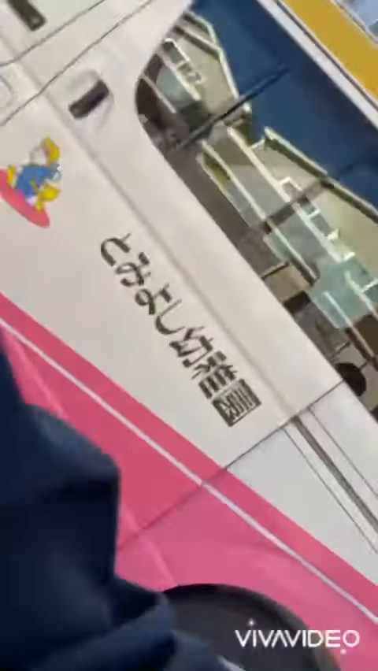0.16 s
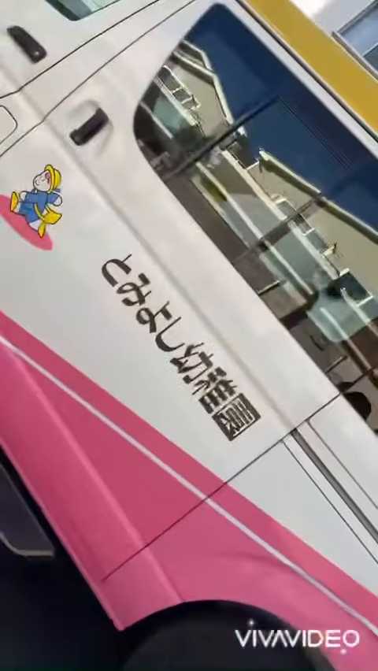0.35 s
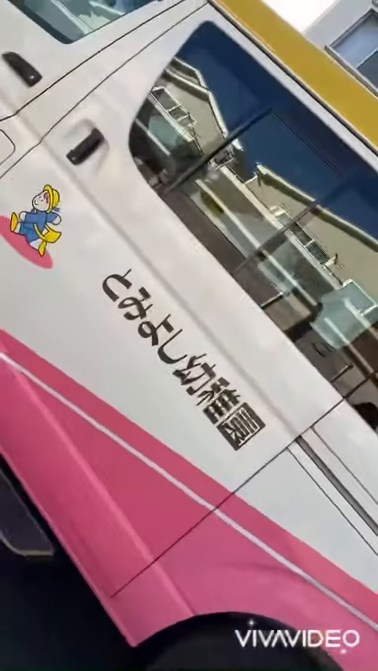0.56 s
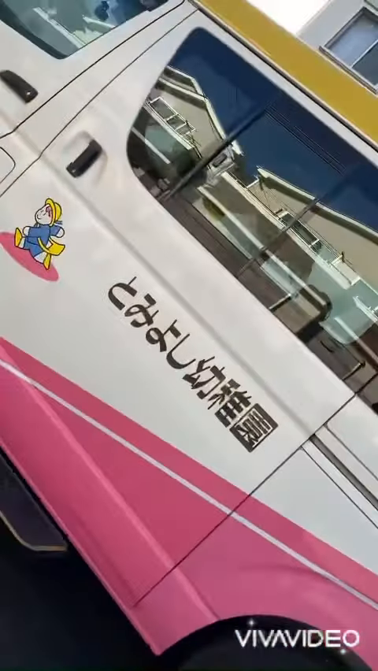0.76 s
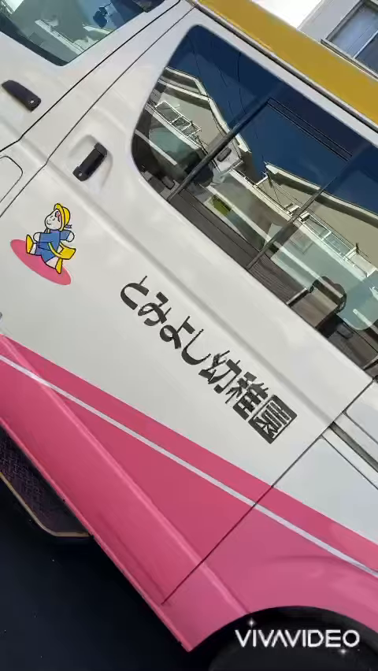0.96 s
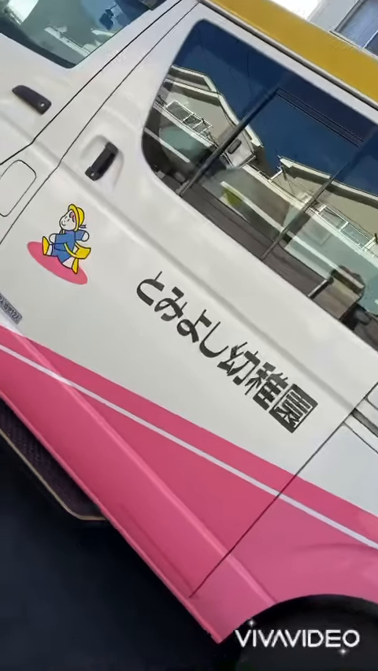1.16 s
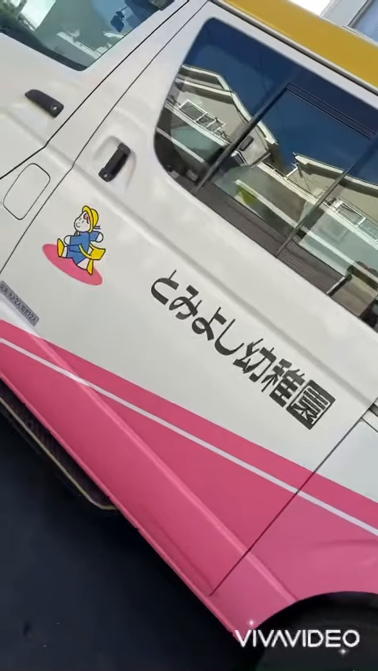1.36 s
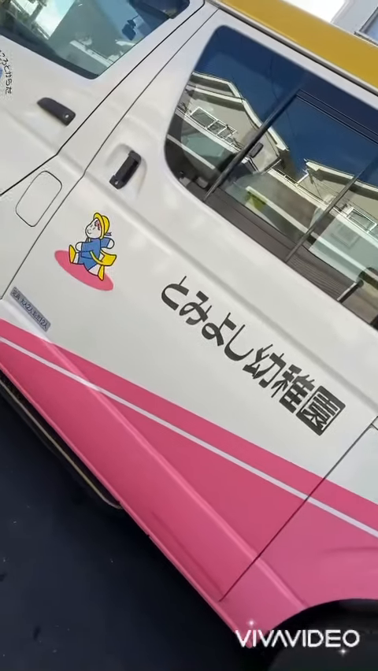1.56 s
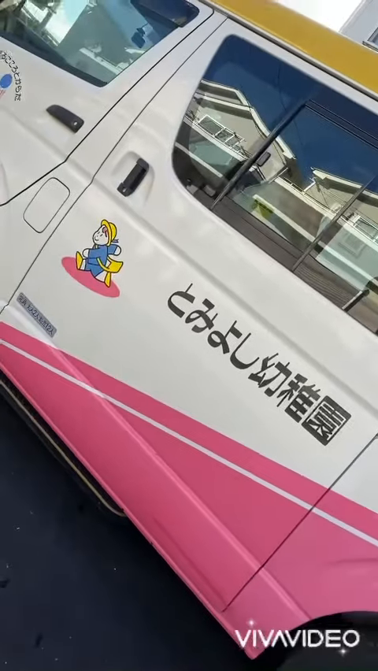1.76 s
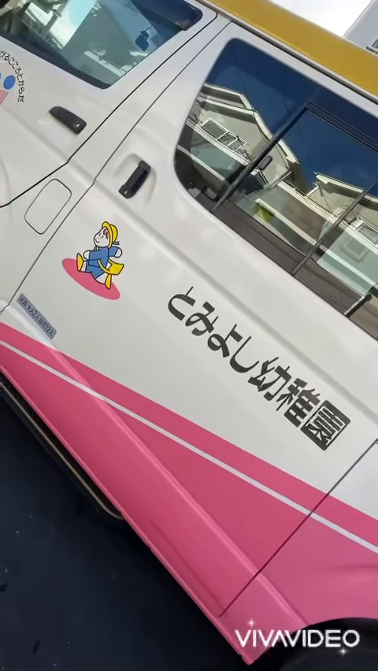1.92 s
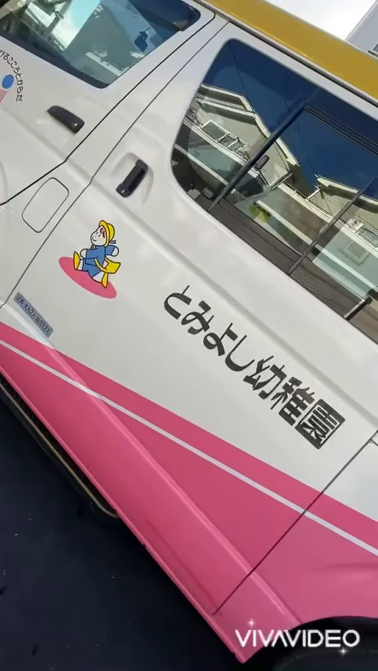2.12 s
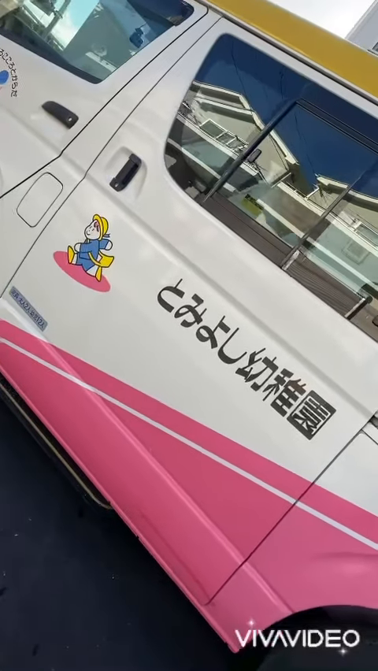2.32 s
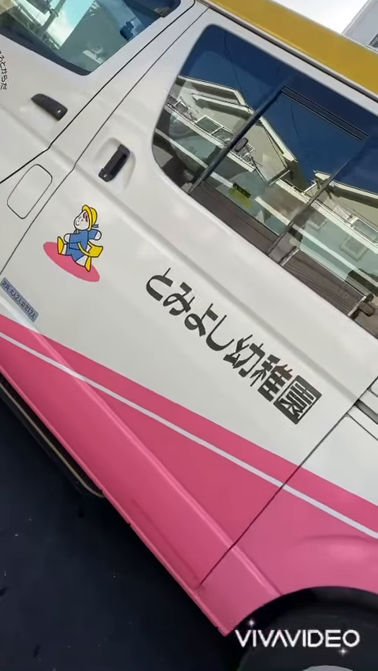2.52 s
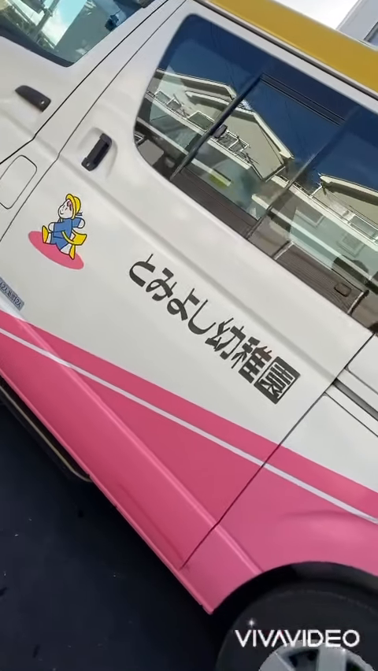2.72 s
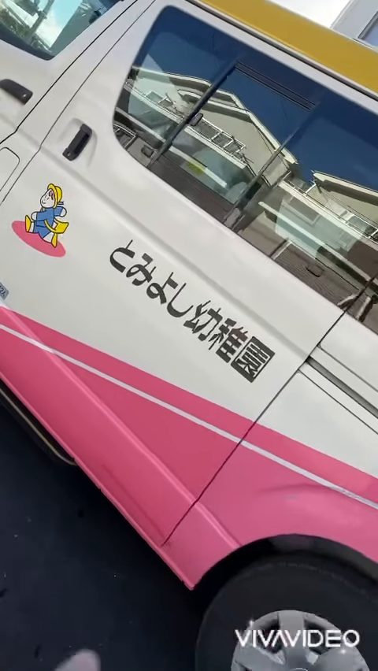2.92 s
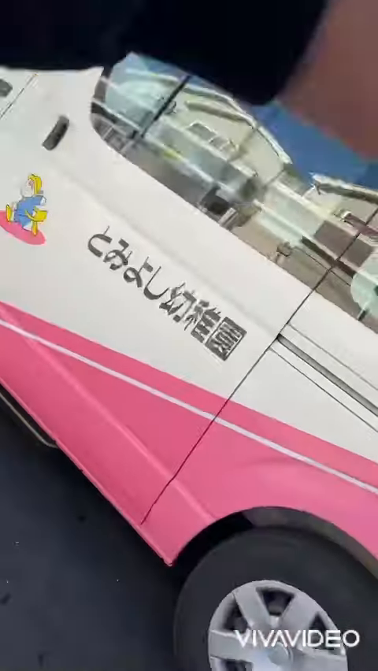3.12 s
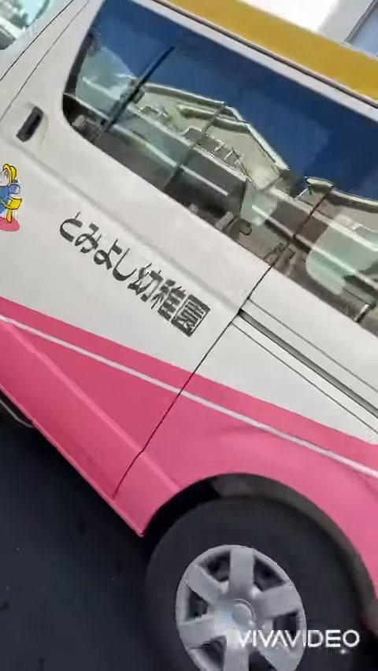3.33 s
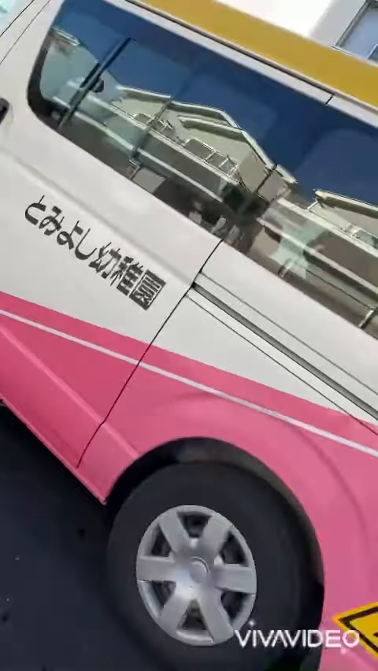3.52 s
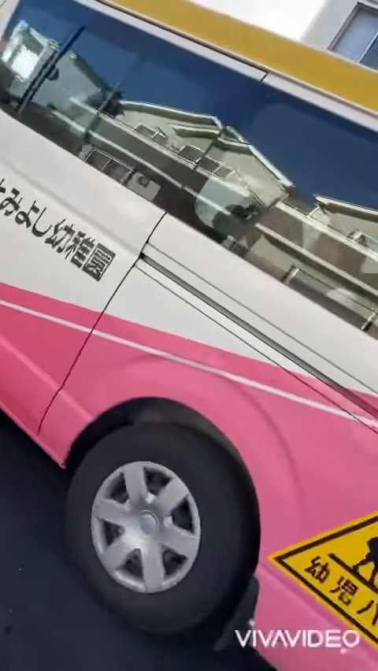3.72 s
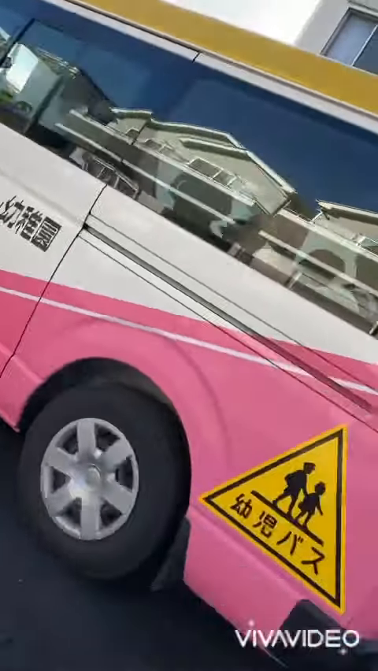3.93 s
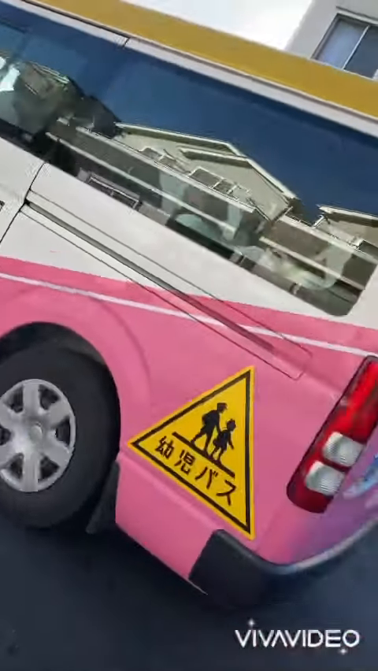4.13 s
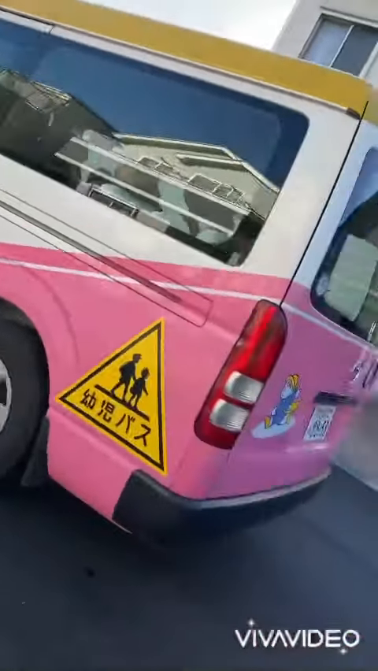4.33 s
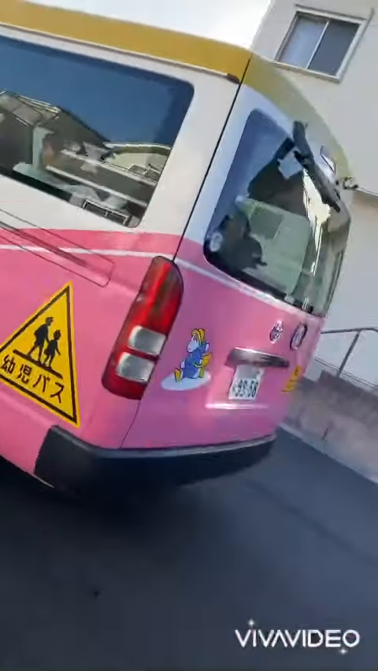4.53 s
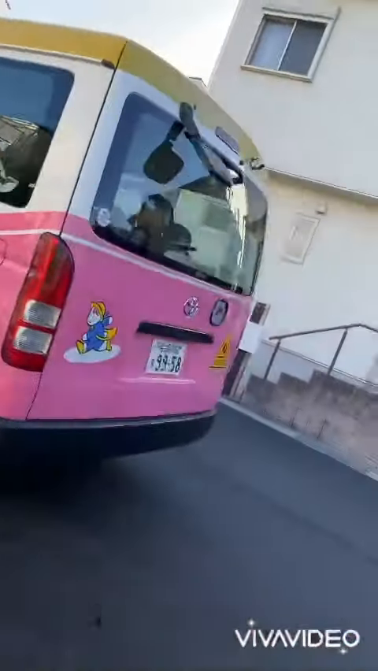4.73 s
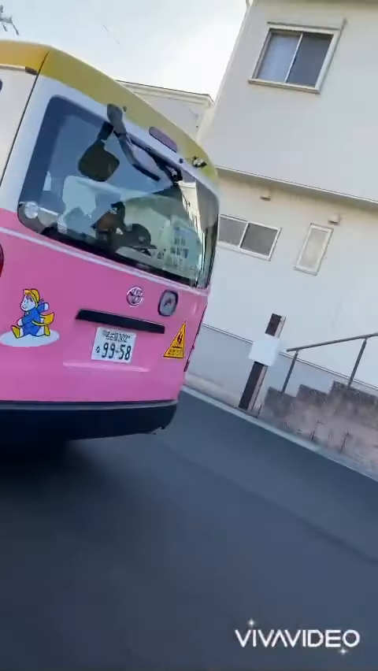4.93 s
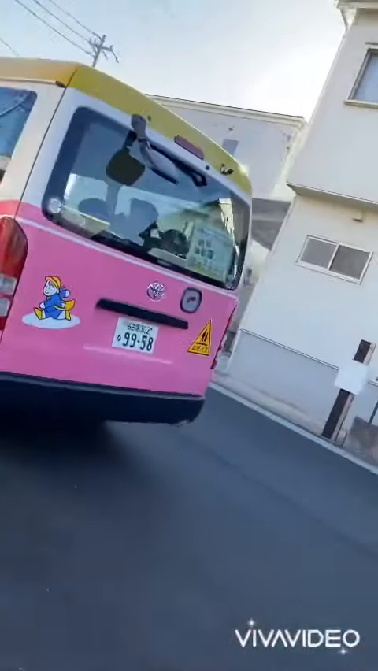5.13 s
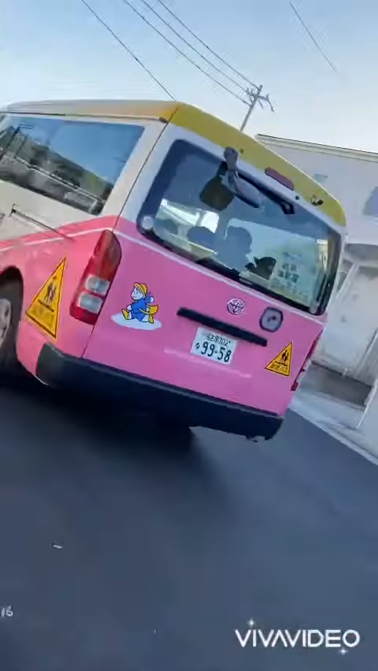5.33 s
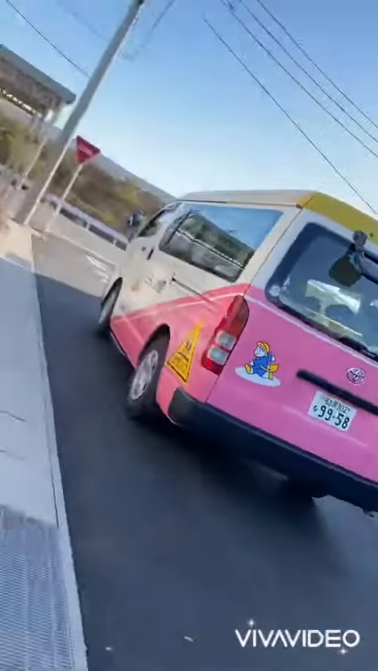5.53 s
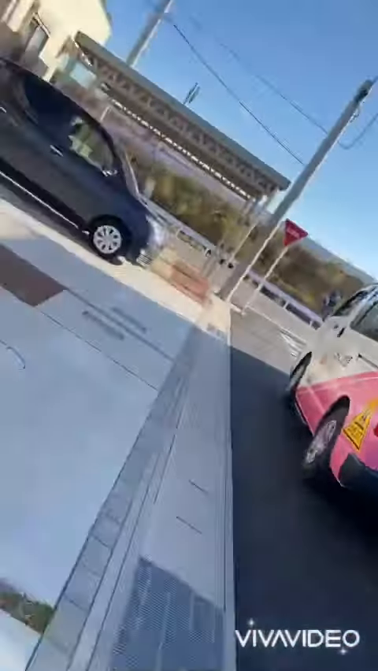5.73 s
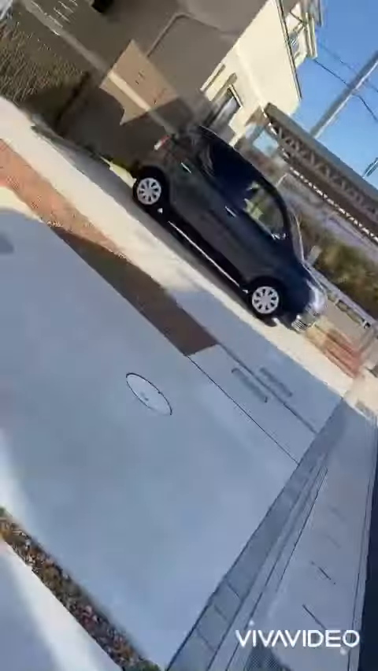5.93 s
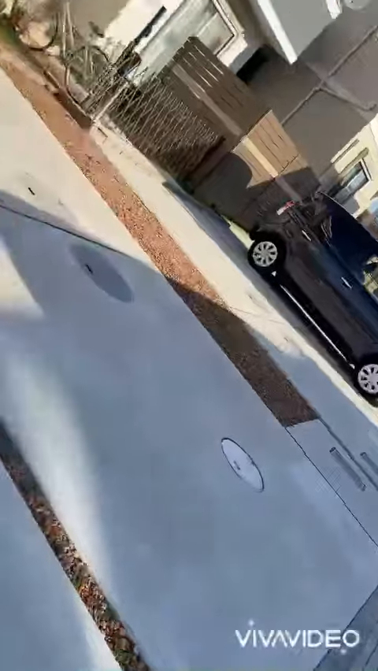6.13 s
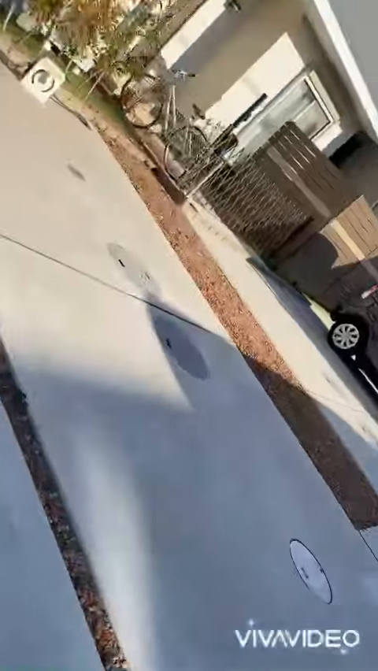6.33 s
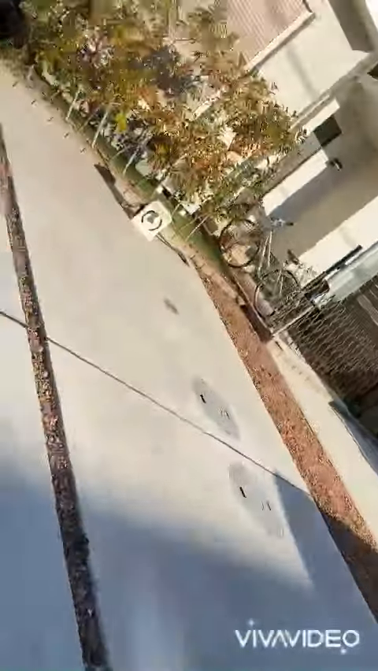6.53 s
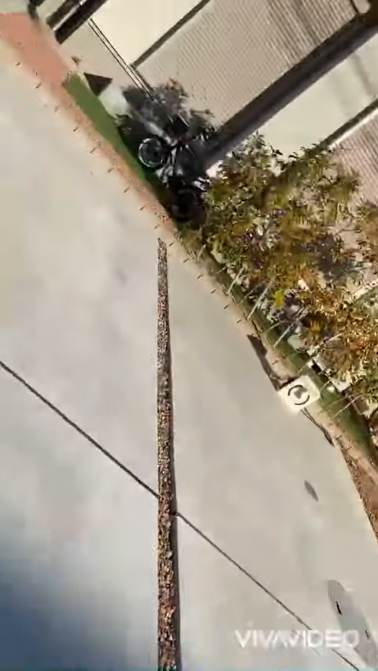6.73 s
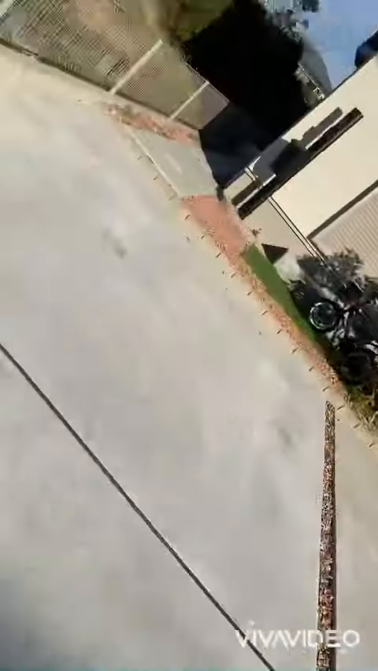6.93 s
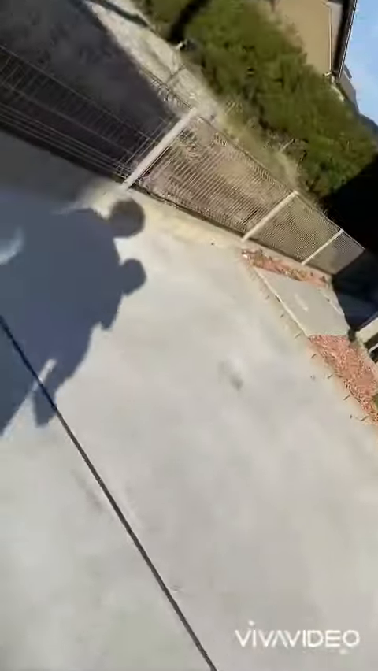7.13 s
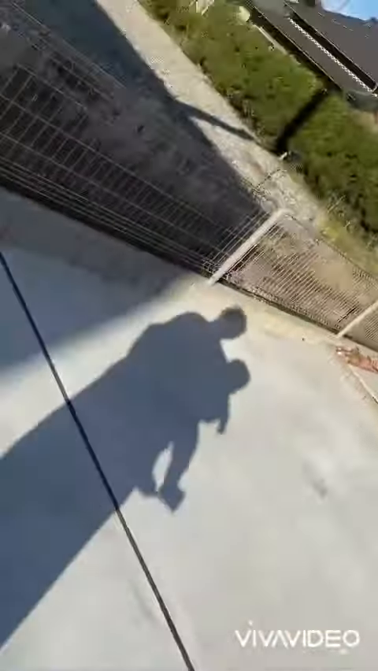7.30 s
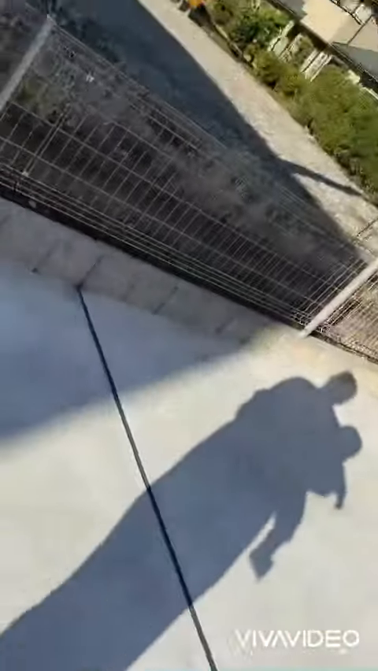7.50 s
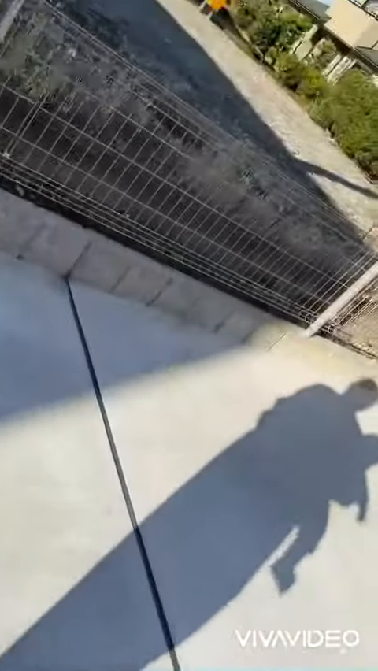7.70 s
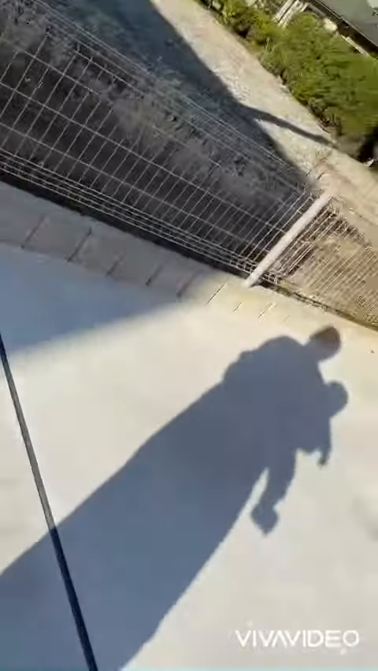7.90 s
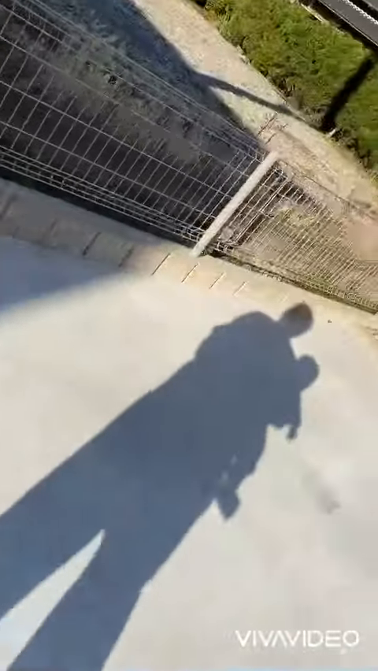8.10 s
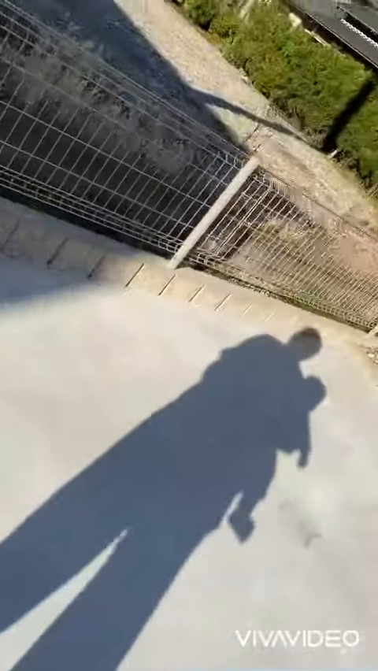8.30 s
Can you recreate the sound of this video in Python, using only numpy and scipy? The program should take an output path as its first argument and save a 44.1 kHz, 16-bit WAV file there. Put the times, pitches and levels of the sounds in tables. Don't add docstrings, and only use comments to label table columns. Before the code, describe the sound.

Heavy vehicle door slam and latch snap, idling engine, then revving departure down the street, fading to distant traffic, shoe scuffs and small birds.

```python
import sys
import numpy as np
from scipy import signal
from scipy.fft import rfft, irfft, next_fast_len
from scipy.io import wavfile
from scipy.ndimage import uniform_filter1d

SR = 44100
rng = np.random.default_rng(int(sys.argv[2]) if len(sys.argv) > 2 else 0)


def log_audio(samples):
    frames = np.atleast_2d(samples).T
    limited = np.clip(frames, -1, 1)
    pcm = np.round(limited * 32767).astype(np.int16)
    wavfile.write(sys.argv[1], SR, pcm)


def gain_from_db(level_db):
    decades = np.asarray(level_db, float) / 20
    return 10 ** decades


N = 372909


def rms_one(x):
    return x / np.sqrt(np.mean(x ** 2) + 1e-20)


def in_time(rows, outside=None):
    s, *columns = np.transpose(rows)
    return [np.interp(np.arange(N) / SR, s, c, outside, outside) for c in columns]


def swell(start_s, attack_s, hold_s, release_s):
    top_s = start_s + attack_s
    end_s = top_s + hold_s
    return in_time([(start_s, 0), (top_s, 1), (end_s, 1), (end_s + release_s, 0)])[0]


def band(x, low_hz, high_hz, order=2):
    return signal.sosfilt(signal.butter(order, [low_hz, min(high_hz, .45 * SR)], "band", fs=SR, output="sos"), x)


def drift(rate_per_s):
    every = 40
    r = np.exp(-2 * np.pi * every * rate_per_s / SR)
    white = rng.standard_normal(N // every + 2002)
    slow = signal.lfilter([1], [1, -2 * r, r * r], white)[2000:]
    return np.interp(np.arange(N) / every, np.arange(len(slow)), rms_one(slow - slow.mean()))


def coloured(spectrum, patchy_db, source=None, count=2):
    hz, db = np.transpose(spectrum)
    edges = np.geomspace(hz[0], hz[-1], int(count * np.log2(hz[-1] / hz[0])) + 2)
    white, shared, out = rng.standard_normal((2, N)), drift(15), 0
    if source is not None:
        white = white * source
    for k, (low, high) in enumerate(zip(edges, edges[1:])):
        level_db = np.interp(np.log(low * high) / 2, np.log(hz), db)
        flicker_db = patchy_db * (0.38 * shared + drift(14.0))
        out = out + gain_from_db(level_db + flicker_db) * band(white[k % 2], low, high)
    return rms_one(out)


def resonate(x, hz, width_hz):
    r = np.exp(-np.pi * width_hz / SR)
    return signal.lfilter(np.array([1, 0, -1]) * (1 - r * r) / 2, [1, -2 * r * np.cos(2 * np.pi * hz / SR), r * r], x)


def add_at(out, start_s, sound):
    i = round(start_s * SR)
    out[i:i + len(sound)] += sound[:N - i]


def opened_out():
    return swell(3.67, 0.17, N / SR, 1)


def labouring():
    return swell(2.73, 0.37, 0.58, 0.14)


# pitch_hz, level_db [dB per Hz]
TRAFFIC_SPECTRUM = [(60, 2), (130, 4), (300, -11.5), (600, -14), (900, -5.5), (1400, -17.5), (2200, -36)]


def traffic():
    return gain_from_db(-49) * swell(7.35, 0.33, N / SR, 1) * coloured(TRAFFIC_SPECTRUM, 1.6)


# pitch_hz, level_db, wobble_db
STREET_HUMS = [
    (59, -43.5, -3),
]


def hums():
    t = np.arange(N) / SR
    fan_gain = gain_from_db(-41 + 2.0 * drift(5)) * swell(2.7, 0.24, 1.0, 0.25)
    out = fan_gain * np.sin(2 * np.pi * 230.5 * t + 0.56 * drift(3))
    for hz, db, wobble_db in STREET_HUMS:
        out += gain_from_db(db + wobble_db * drift(2.9)) * np.sin(2 * np.pi * hz * t + 0.38 * drift(0.97))
    return out


# start_s, length_s, first_pitch_hz, last_pitch_hz, level_db
FALLING_CHIRPS = [(6.64, .022, 5900, 4900, -59), (6.74, .022, 5900, 4700, -62),
                  (6.85, .025, 5600, 4300, -64), (6.992, .03, 4200, 3750, -55),
                  (7.168, .032, 4100, 3620, -54), (7.295, .04, 4050, 3680, -55),
                  (7.432, .04, 4000, 3550, -53), (8.19, .035, 4650, 3650, -51),
                  (8.308, .035, 4650, 3500, -53)]
# time_s, pitch_hz, level_db
ARCHED_CALLS = [
    [(7.812, 2750, -64), (7.822, 3150, -54), (7.831, 3500, -47), (7.845, 2950, -56)],
    [(7.874, 3100, -54), (7.888, 3650, -44), (7.899, 4020, -46), (7.908, 3850, -45), (7.922, 3670, -42),
     (7.934, 3200, -51), (7.948, 2980, -56), (7.962, 2800, -62)],
    [(7.818, 3950, -64), (7.833, 4570, -52), (7.846, 4150, -58), (7.866, 3720, -56), (7.882, 4120, -51),
     (7.899, 4420, -48), (7.916, 3900, -54)],
    [(7.926, 4250, -60), (7.936, 4420, -54), (7.946, 4200, -62)],
    [(7.992, 3050, -56), (8.004, 3500, -57), (8.016, 3950, -62)],
]


def sparrows():
    out = np.zeros(N)
    falls = []
    for s, d, first, last, db in FALLING_CHIRPS:
        falls.append([(s, first, db - 9), (s + .3 * d, .65 * first + .35 * last, db),
                      (s + .7 * d, .3 * first + .7 * last, db), (s + d, last, db - 9)])
    hoarse = rms_one(band(rng.standard_normal(N), 50, 280))
    for notes, rough in ((falls, .65), (ARCHED_CALLS, .12)):
        for note in notes:
            s, hz, db = np.transpose(note)
            i = np.arange(round(s[0] * SR), round(s[-1] * SR))
            pitch_hz = uniform_filter1d(np.interp(i / SR, s, hz), size=150)
            edge = np.clip(np.minimum(i - i[0], i[-1] - i) / 130, 0, 1)
            level = gain_from_db(np.interp(i / SR, s, db)) * edge * (1 + rough * hoarse[i])
            out[i] += level * np.sin(2 * np.pi * np.cumsum(pitch_hz) / SR)
    tail = rng.standard_normal(22000) * gain_from_db(-60 * np.arange(22000) / SR / .6)
    return out + gain_from_db(-36.5) * signal.fftconvolve(out, tail)[:N]


# start_s, length_s, level_db
SHOE_SCUFFS = [(7.425, .16, -59), (7.99, .135, -57), (7.6, .1, -71), (8.17, .1, -66), (6.78, .18, -68),
               (7.06, .05, -64), (2.96, .3, -60), (8.4, .06, -64), (7.28, .08, -67)]


def scuffs():
    t, shape = np.arange(N) / SR, 0
    for s, length, db in SHOE_SCUFFS:
        onset = np.clip((t - s) / 0.013, 0, 1)
        taper = np.clip((s + length - t) / (0.3 * length), 0, 1)
        shape = shape + gain_from_db(db) * onset * taper
    return shape * coloured([(2500, 10.0), (6000, 20.5), (10000, 2.0), (16000, 21.0)], 1.8)


def scrape():
    grit = rng.standard_normal(N)
    low_grit = gain_from_db(-53.5) * rms_one(band(grit, 600, 2100))
    high_grit = gain_from_db(-56.5) * rms_one(band(grit, 2300, 6500))
    return swell(1, 0.14, .05, .08) ** 2 * (low_grit + high_grit)


# start_s, peak_db, pitch_hz, t60_s (time to die by 60 dB)
OPEN_TICKS = [(0.001, -13, 2980, 0.004), (0.0155, -19.5, 3230, 0.041), (0.096, -18, 2360, 0.08),
              (0.105, -17, 2185, 0.072), (0.1282, -38.5, 2360, 0.04), (0.141, -19.5, 2280, 0.13),
              (0.206, -30, 2285, 0.085), (1.243, -43, 2290, 0.032), (1.412, -58.5, 5620, 0.058),
              (1.4557, -35, 4800, 0.078), (1.462, -35, 3920, 0.028), (1.611, -38.5, 2730, 0.017),
              (1.8465, -42.5, 5570, 0.044), (2.108, -42, 3780, 0.096), (2.4143, -37, 4310, 0.04),
              (7.068, -54.5, 5130, 0.12), (7.427, -44, 3780, 0.029), (7.4608, -40.5, 3810, 0.035),
              (7.992, -37.5, 3700, 0.082), (8.1178, -48.5, 6300, 0.052)]


def ticks():
    out, t = np.zeros(N), np.arange(4000) / SR
    for (s, db, hz, t60), noise in zip(OPEN_TICKS, rng.standard_normal((len(OPEN_TICKS), 4000))):
        puff = band(noise, 2000, 20000, order=1) * gain_from_db(-60 * t / max(t60, .005))
        puff = 0.14 * puff + 0.48 * resonate(puff, hz, .5 * hz)
        add_at(out, s, gain_from_db(db + 4.0) * puff)
    return out


# start_s, peak_db, pitch_hz, t60_s
INNER_TICKS = [(.3395, -36.5, 3900, .02), (0.28, -32, 4600, .025), (0.33, -30.5, 5600, 0.028),
               (0.36, -38.5, 5600, .04), (0.97, -42, 3000, 0.066), (.554, -43.5, 3500, .03),
               (.253, -38, 3500, .03)]


def muffled_ticks():
    out, t = np.zeros(N), np.arange(4000) / SR
    for (s, db, hz, t60), noise in zip(INNER_TICKS, rng.standard_normal((len(INNER_TICKS), 4000))):
        puff = band(noise * gain_from_db(-60 * t / max(t60, .005)), 1500, 6500, order=3)
        add_at(out, s, gain_from_db(db + 4.0) * (0.22 * puff + 0.62 * resonate(puff, hz, .5 * hz)))
    return out


# start_s, peak_db, pitch_hz, t60_s
RINGING_PARTS = [(.096, -28.5, 6580, 0.036), (0.1, -29.5, 5300, .1), (.104, -23, 3440, 0.066),
                 (.106, -22, 2180, 0.068), (.113, -8.5, 699, .1), (.123, -26, 3500, .04),
                 (0.122, -21, 2325, 0.063), (.142, -25.5, 3360, .05), (.144, -26.5, 2330, 0.066),
                 (.16, -16.5, 706, .1), (0.207, -37.5, 5140, 0.084), (.209, -34.5, 2310, .05),
                 (.499, -27.5, 644, 0.054), (.646, -36.5, 700, .05), (1.194, -33, 720, .05),
                 (.227, -36, 2290, .06), (.226, -15.5, 696, .06), (.338, -37, 4310, 0.027),
                 (.35, -29.5, 4560, 0.024), (.351, -36, 3370, .025), (.35, -38.5, 5500, 0.028),
                 (0.351, -25, 1530, 0.036), (0.377, -35.5, 1886, .03), (1.407, -42, 5700, .08),
                 (1.414, -46, 4170, .07), (1.438, -36, 1903, 0.11), (1.446, -29, 1314, 0.11),
                 (1.456, -32, 4770, .03), (1.464, -32, 4010, .04), (1.463, -12.5, 1346, 0.055),
                 (1.464, -20.5, 1615, 0.063), (1.468, -24.5, 2095, 0.037), (1.49, -34.5, 1705, 0.14),
                 (1.492, -37, 2120, .12), (1.529, -45, 5440, .04), (1.536, -37.5, 1874, .1),
                 (3.11, -25.5, 230.7, 0.96), (3.099, -26.5, 131.6, 1), (5.68, -38.5, 63, 0.49),
                 (6.46, -26.5, 58.2, .4)]


def clinks():
    out, t = np.zeros(N), np.arange(SR // 2) / SR
    chances = rng.uniform(-1, 1, (len(RINGING_PARTS), 2, 3))
    spread, lasts = .04, .65
    for (s, db, hz, t60), (apart, start) in zip(RINGING_PARTS, chances):
        ring = np.sin(2 * np.pi * hz * t)
        for a, b in zip(apart, start):
            ring += 0.5 * np.sin(2 * np.pi * hz * (1 + 2 * spread * a) * t + np.pi * b)
        onset = np.clip(t / (0.072 * t60), 0, 1)
        add_at(out, s, gain_from_db(db - 60 * t / (lasts * t60)) * onset * ring)
    return out


# start_s, level_db
PIN_BLOWS = [
    (0.105, -14.5),
    (0.143, -21),
    (1.461, -13),
]
# pitch_hz, level_db, t60_s
STEEL_MODES = [(1290, 0, 0.078), (1482, -1, .07), (1660, -1, 0.13), (1870, -12, 0.1), (2120, -11, .12),
               (3610, -14.5, 0.065), (5420, -17.5, .05)]


def pin():
    t = np.arange(N) / SR
    shape = sum(gain_from_db(db - 60 * np.clip(t - s, 0, 1) / 0.061) * (t > s) for s, db in PIN_BLOWS)
    burst, out = rng.standard_normal(N) * shape, 0
    for hz, db, t60 in STEEL_MODES:
        out = out + gain_from_db(db) * np.sqrt(SR * t60 / 200) * resonate(burst, hz, 2.4 / t60)
    return out


# start_s, peak_db, pitch_hz
DEAD_BLOWS = [(.112, -15, 329), (0.118, -11.5, 420), (0.134, -12, 300), (.146, -11.5, 352),
              (.212, -13.5, 422), (.355, -11, 382), (0.3539, -19.5, 994), (1.466, -18, 800),
              (.499, -20, 620), (.645, -26.5, 566), (1.4682, -9, 331), (1.523, -15.5, 300),
              (6.477, -24.5, 108.7), (6.93, -24, 150.4)]


def dead_knocks():
    out, t = np.zeros(N), np.arange(4000) / SR
    cycles = 1.5
    for s, db, hz in DEAD_BLOWS:
        add_at(out, s, -gain_from_db(db - 60 * t * hz / cycles) * np.sin(2 * np.pi * hz * t))
    return out


# start_s, peak_db, pitch_hz, t60_s
PANEL_BLOWS = [(0.091, -19, 386, 0.04), (0.115, -9.5, 474, 0.037), (0.147, -21, 564, 0.037),
               (0.209, -19.5, 536, 0.12), (0.5, -23.5, 568, 0.03), (0.647, -33, 609, 0.037),
               (1.195, -23, 464, 0.033), (.56, -25, 298, 0.055), (1.145, -25, 301, 0.072),
               (1.245, -26, 328, 0.061), (1.29, -25, 379, 0.078), (1.452, -20, 417, 0.042),
               (7.361, -32.5, 287, 0.076), (1.469, -13.5, 450, 0.083), (1.522, -21, 415, 0.045),
               (7.423, -29, 320, 0.074)]


def thuds():
    out, t = np.zeros(N), np.arange(12000) / SR
    for s, db, hz, t60 in PANEL_BLOWS:
        ring = np.sin(2 * np.pi * hz * t)
        ring += 0.79 * np.sin(2 * np.pi * 0.52 * hz * t)
        ring += .5 * np.sin(2 * np.pi * 1.2 * hz * t)
        add_at(out, s, gain_from_db(db - 60 * t / t60) * np.clip(t / (0.04 * t60), 0, 1) * ring)
    return out


def brake_squeak():
    start_s, length_s, pitch_hz, level_db = 4.625, .075, 2210, -48
    t = np.arange(N) / SR - start_s
    return gain_from_db(level_db) * np.sin(np.pi * np.clip(t / length_s, 0, 1)) * np.sin(2 * np.pi * pitch_hz * t)


def jolted(jolts, brightens, lasts):
    t, power = np.arange(2 * SR) / SR, 0
    for s, db, build, t60, bright_db in jolts:
        shape_db = np.where(t < s, 30 * (s - t) / build, 60 * (t - s) / (lasts * t60))
        power = power + gain_from_db(db + brightens * bright_db - shape_db) ** 2
    return np.pad(np.sqrt(power), (0, N - 2 * SR))


# pitch_hz, width_hz, slam_level_db, latching_level_db
PANEL_MODES = [(202, 39, 3, 9.5), (263, 33, 3, 10), (320, 80, 1.5, 3.5), (440.5, 69, 3, 1),
               (486.5, 42.7, 4.5, 4), (580, 71, -2, -3), (651, 57, 1, -3.5), (824, 690, -12.5, -14.5),
               (1320, 290, -14.5, -11), (1820, 210, -24, -18), (2130, 110, -25.5, -16)]
# time_s, panel_level_db, build_up_s, t60_s, brightness_db
DOOR_JOLTS = [
    [(0.002, -18.5, 0.018, 0.22, -9.5), (0.097, -16.5, 0.018, 0.38, -2), (0.124, -13.5, 0.04, 0.37, 4.5),
     (0.21, -27.5, 0.043, 0.34, -11), (0.356, -29, 0.02, 0.12, 0.5)],
    [(1.21, -34.5, 0.59, 0.55, -8), (1.245, -26, 0.11, 0.42, -6), (1.3, -31, .04, .25, -0.5),
     (1.468, -20, 0.032, 0.24, 0), (1.5, -31, 0.034, 0.84, -5)],
]
# pitch_hz, level_db [dB per Hz]
RATTLE_SPECTRUM = [(710, -31), (1200, -1), (2300, -13), (3740, -21), (5130, -19), (8260, -22), (9820, -16),
                   (11600, -31), (14800, -23), (16000, -35)]


def door():
    hits = rng.random(N) < 600 / SR
    knocks = hits * gain_from_db(3.5 * rng.exponential(1, N).clip(0, 4)) * rng.choice([-1, 1], N)
    rings = [(-1) ** k * resonate(knocks, hz, width) for k, (hz, width, *_) in enumerate(PANEL_MODES)]
    boom, rattle = band(rng.standard_normal(N), 38, 115), coloured(RATTLE_SPECTRUM, 3)
    slam_db, latching_db = np.transpose(PANEL_MODES)[2:]
    out = 0
    for jolts, modes_db, boom_db in zip(DOOR_JOLTS, (slam_db, latching_db), (-7.5, -19)):
        out = out + jolted(jolts, 0, 0.66) * rms_one(gain_from_db(modes_db) @ rings)
        out = out + gain_from_db(boom_db) * jolted(jolts, -0.19, 4.1) * rms_one(boom)
        out = out + gain_from_db(-14.5) * jolted(jolts, 0.47, 0.68) * rattle
    shudder = gain_from_db(-23.5 - 60 * np.arange(N) / SR / 2.85)
    return out + shudder * rms_one(gain_from_db(slam_db) @ rings)


# pitch_hz, level_db [dB per Hz]
RUMBLE_SPECTRUM = [(14, -16.5), (30, -11.5), (49, 4.5), (81, -4.5), (119, -1.5), (168, -14), (226, -13),
                   (305, -18.5), (342, -15.5), (517, -15), (900, -38.5), (1170, -64), (1980, -120)]
CLATTER_SPECTRUM = [(470, -32.5), (800, -18), (992, 5), (1170, 2), (1490, 4), (2800, -10.5), (3640, -77.5),
                    (6160, -120)]
HISS_SPECTRUM = [(1410, 8), (2400, -0.5), (3990, 1.5), (4800, -5), (5570, -2.5), (6840, -9), (8610, -6),
                 (13500, -10.5), (14800, -12.5), (16000, -35)]


def roar(turn, bay_db, tail_db):
    gone_s = np.clip(np.arange(N) / SR - 4.0, 0, 2.5)
    tail_sweeps_past = swell(4.4, 0.13, 0.76, 0.31)
    clatter_db = -53.5 + 0.69 * bay_db + 0.048 * tail_db + 4 * tail_sweeps_past
    hiss_db = -57 + 1.35 * bay_db + 2 * labouring()
    body_gain = np.hypot(gain_from_db(-36.5 + 0.36 * bay_db), gain_from_db(-43.5))
    clatter_gain = np.hypot(gain_from_db(clatter_db), gain_from_db(-62))
    hiss_gain = np.hypot(gain_from_db(hiss_db), gain_from_db(-64.5))

    rumble = coloured(RUMBLE_SPECTRUM, 1.4)
    deep = band(rumble, 17, 120)
    body = signal.sosfilt(signal.butter(2, 95, "high", fs=SR, output="sos"), rumble)
    puff = 1 + 0.047 * np.cos(turn)
    out = body_gain * rms_one(body) + clatter_gain * coloured(CLATTER_SPECTRUM, 1.9, puff)
    hiss = coloured(HISS_SPECTRUM, 1.3, puff, count=3)
    near = gain_from_db(-2.5 * gone_s)
    dull = signal.sosfiltfilt(signal.butter(2, 8000, fs=SR, output="sos"), hiss)
    arm_shade = gain_from_db(-4.5 * swell(2.85, .04, 0.079, .02))
    out += hiss_gain * (arm_shade * dull + near * (hiss - dull))
    gusts_db = 6.5 * drift(0.91).clip(-1.2, .6)
    return out + gain_from_db(-43.5 + gusts_db) * rms_one(deep)


# pitch_hz, level_db
PIPE_RESONANCES = [(138, -2), (152, 0), (166, -11), (200, -11), (232, 0), (252, -1), (280, -14), (312, 1),
                   (340, 2), (368, -9), (398, 0), (425, -4), (458, -6), (490, -18)]
# order (multiple of the firing rate), start_s, length_s, level_db
HOUSE_ECHOES = [(2, 3.25, .2, 3.5), (2, 3.55, .25, 4), (4, 3.4, .45, 0), (4, 3.3, 2.5, 7), (6, 5.2, 1, 3),
                (8, 5.5, 0.43, -8), (8, 5.9, 0.86, 4), (8, 4.8, 0.26, -4.5), (9, 3.8, 0.6, -6.5),
                (4, 3.85, .45, 3.5), (9, 5.9, 0.64, 1.5), (10, 6.1, 0.55, 4), (10, 5.2, 0.57, -1),
                (11, 3.75, 1.1, 3.5), (11, 4.9, 0.65, -9), (11, 6.0, 1.4, 5.5), (12, 3.6, 1.2, -9.5),
                (12, 6.2, 0.64, 7.5), (5, 7, 0.82, 7), (7, 3.1, 0.8, -4.5), (8, 4.7, 0.78, 5),
                (10, 4.5, 0.73, -1), (6, 5.3, 0.54, 3.5), (2, 7, 2.9, -10), (7, 3.0, 0.69, -5),
                (6, 4.2, 0.44, 0.5), (10, 4.5, 0.72, 2), (9, 5.2, 0.91, 4), (3, 6.8, .3, -1.5),
                (6, 3.1, 0.5, -6.5), (3, 3.5, .35, 0.5)]


def engine_tone(firing_hz, low_db, boom_db, upper_db):
    turn = 2 * np.pi * np.cumsum(firing_hz) / SR
    pipe_hz, pipe_db = np.transpose(PIPE_RESONANCES)
    hidden_db = -10.5 * (1 - opened_out())
    out = 0
    for k in range(1, 14):
        hz = k * firing_hz
        first = gain_from_db(-50.0) / (1 + ((hz - 42) / 9) ** 4)
        low = gain_from_db(low_db) / (1 + ((hz - 68) / 22) ** 6)
        boom = gain_from_db(boom_db) / (1 + ((hz - 116) / 15) ** 6)
        resonance_db = np.interp(hz, pipe_hz, pipe_db, left=-40, right=-40)
        upper = gain_from_db(upper_db + resonance_db + 0.7 * drift(2.5) + hidden_db * (hz > 275))
        echo_db = 0
        for order, s, d, db in HOUSE_ECHOES:
            if order == k:
                echo_db = echo_db + db * swell(s, .2 * d, 0.54 * d, 0.14 * d)
        phase = k * (turn + .018 * drift(9.9)) + rng.uniform(0, 2 * np.pi)
        out = out + gain_from_db(echo_db) * (first + low + boom + upper) * np.sin(phase)
    t = np.arange(N) / SR
    fade = np.clip((t - .2) / 0.035, 0, 1) * np.clip((7.5 - t) / 0.29, 0, 1)
    return np.sqrt(2) * out * fade, turn


# low_hz, high_hz, lost_share (of the time)
FLICKER_BANDS = [(4850, 5150, .14), (6900, 7200, .25), (7200, 7600, .4), (7600, 8000, .75),
                 (8000, 8400, .92), (11500, 12000, .92), (12000, 12500, .7), (12500, 13100, .3),
                 (13100, 13600, .12), (14600, 15200, .2), (15200, 16000, .45), (1000, 1200, .06),
                 (5900, 6200, .06)]


def flicker(mid):
    size = next_fast_len(N)
    spectrum, hz = rfft(mid, size), np.fft.rfftfreq(size, 1 / SR)
    busy = swell(3.1, .5, 2.4, .4)
    for low, high, lost in FLICKER_BANDS:
        chance = np.repeat(rng.random(N // 1024 + 1), 1024)[:N]
        gone = uniform_filter1d(1. * (chance < lost * (1 + 1.3 * busy * (low > 12000))), size=400)
        mid = mid - gone * irfft(spectrum * ((hz >= low) & (hz < high)), size)[:N]
    return mid


STEERING_EDGES = [15, 165, 450, 950, 1400, 2500, 17000]
# left_lean (share), wander_rad, wander_rate_per_s
SIDE_PHASES = [(-.35, .25, 20), (-.1, .3, 20), (.1, .5, 25), (.4, 1.0, 60), (.25, 1.5, 90), (.02, 1.3, 130)]
# before_opening_db, after_opening_db, spread_share, bay_nearness_share
SIDE_LEVELS = [(-45, 3, -0.1, 0.024), (-17, -5, 0.18, 0), (-3.5, 0, 0.91, 0), (2, 6.5, 1, 0.54)]
# burst_db, tilt_db [dB per octave]
UNSETTLED_SIDES = [(13, 3), (4, 7), (0, 0), (0, 0), (0, 0), (0, 0)]
# time_s, spread_db
FIELD_SPREAD = [(0, 2.5), (.15, -6), (1.3, -3.5), (1.7, 3.5), (2.2, 5), (3.2, 4), (3.6, 5), (4.2, 2),
                (4.6, -6.5), (5.0, -9), (5.5, -2.5), (6.2, -2.5), (7.0, 1), (7.4, 6), (8.45, 5.5)]
# start_s, length_s, level_db
HOLLOW_FILLS = [
    (0, .002, 0),
    (1.456, .014, -16),
]


def ports(sound, bay_db):
    size, ceiling = next_fast_len(N), .68
    spectrum, hz = rfft(ceiling * np.tanh(sound / ceiling), size), np.fft.rfftfreq(size, 1 / SR)
    mid, side = 0, 0
    opened, (spread_db,), bursts = opened_out(), in_time(FIELD_SPREAD), drift(6.1)
    widths_db = []
    for before, after, a, b in SIDE_LEVELS:
        widths_db.append(before + (after - before) * opened + a * spread_db + b * bay_db)
    widths_db += [-0.5, 1.5]
    bands = zip(STEERING_EDGES, STEERING_EDGES[1:], SIDE_PHASES, widths_db, UNSETTLED_SIDES)
    for low, high, (lean, wander, rate), db, (burst_db, tilt_db) in bands:
        edges = np.geomspace(low, high, int(1.5 * np.log2(high / low)) + 2)
        for a, b in zip(edges, edges[1:]):
            unsettled_db = burst_db * bursts + tilt_db * np.log2(a * b / low / high) / 2
            share = np.arctan(gain_from_db(db + (1 - opened) * unsettled_db))
            part = spectrum * ((hz >= a) & (hz < b))
            straight, quarter = irfft(part, size)[:N], irfft(1j * part, size)[:N]
            phase = np.arccos(lean) + wander * drift(rate)
            mid = mid + np.cos(share) * straight
            side = side + np.sin(share) * (np.cos(phase) * straight + np.sin(phase) * quarter)
    hole = signal.cheby2(5, 28, [8300, 11700], "stop", fs=SR, output="sos")
    blind = flicker(signal.sosfiltfilt(hole, mid))
    leak = sum(gain_from_db(db) * swell(s, 0.0014, length, 0.004) for s, length, db in HOLLOW_FILLS)
    mid = blind + leak * (mid - blind)
    return np.sqrt(2) * np.array([mid + side, mid - side])


# time_s, firing_rate_hz
ENGINE_SPEED = [(0.4, 23.0), (1.0, 22.1), (1.4, 22.2), (2.0, 20.9), (2.2, 21.7), (2.46, 24.2), (2.8, 25.3),
                (2.97, 26.8), (3.38, 37.7), (3.55, 38.0), (3.95, 36.1), (4.2, 36.3), (4.78, 38.9),
                (5.2, 39.7), (5.5, 39.8), (6.7, 42.0), (6.9, 41.5), (7.2, 38)]
# time_s, exhaust_load_db, bay_nearness_db, tailpipe_facing_db
BUS_DRIVE = [(0.3, 1, 4.5, 0), (0.55, 7.5, 2, 8.5), (0.95, -2, 0.5, 0), (1.5, -1.5, 0, -2),
             (2.2, -3.5, 1, -4), (2.35, 9.5, 2.5, -5), (2.95, 2.5, 1.5, -5), (3.3, 9.5, 6.5, 9.5),
             (3.8, 7, 5, 4), (4.3, 6, 6.5, 2.5), (4.7, 10, 5, 6.5), (5.15, 7.5, 5, 5.5), (5.85, 8, 1, 8),
             (6.22, -8, -2, 5.5), (6.6, -1.5, -5.5, 7), (6.85, 1.5, -6.5, 4.5), (6.97, -3.5, -7, -6),
             (7.45, -12, -19, -6)]


def scene():
    load_db, bay_db, tail_db = in_time(BUS_DRIVE)
    lug = labouring()
    low_db = -46.5 + 0.21 * load_db + 9.5 * lug
    boom_db = -37 + load_db
    upper_db = -49.5 + tail_db + 3.5 * lug
    tone, turn = engine_tone(*in_time(ENGINE_SPEED), low_db, boom_db, upper_db)
    street = traffic() + hums() + sparrows() + scuffs()
    latch = scrape() + ticks() + muffled_ticks() + clinks() + pin()
    blows = dead_knocks() + thuds() + door()
    bus = brake_squeak() + roar(turn, bay_db, tail_db) + gain_from_db(-1.5) * tone
    return ports(street + latch + blows + bus, bay_db)


def roll_off(x):
    return signal.sosfilt(signal.butter(12, 16250, fs=SR, output="sos"), x)


def record(dry):
    top = signal.ellip(10, .5, 70, 15700, fs=SR, output="sos")
    return roll_off(signal.sosfilt(top, dry))


dry = scene()
out = record(dry)
log_audio(out)
```